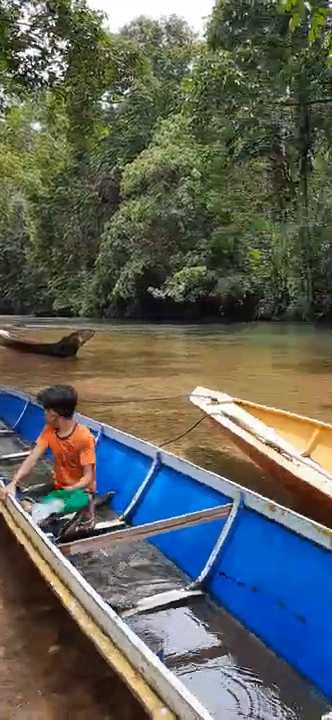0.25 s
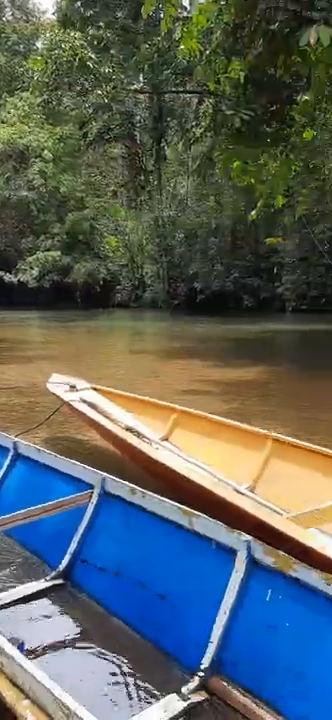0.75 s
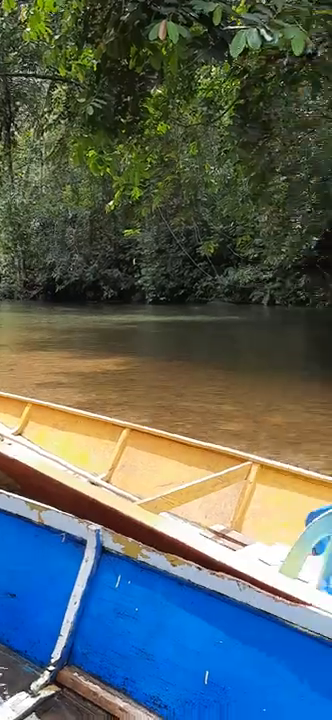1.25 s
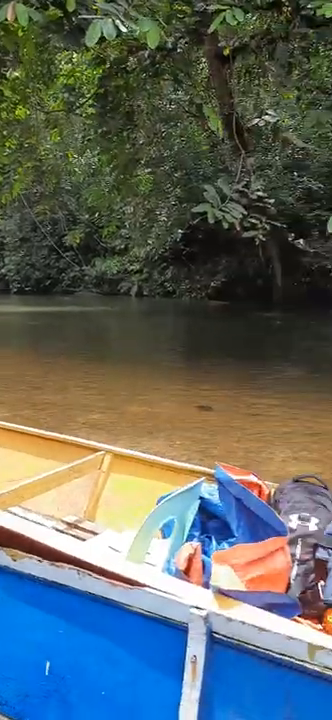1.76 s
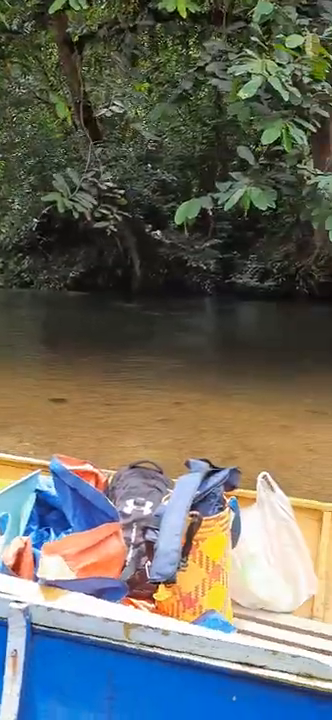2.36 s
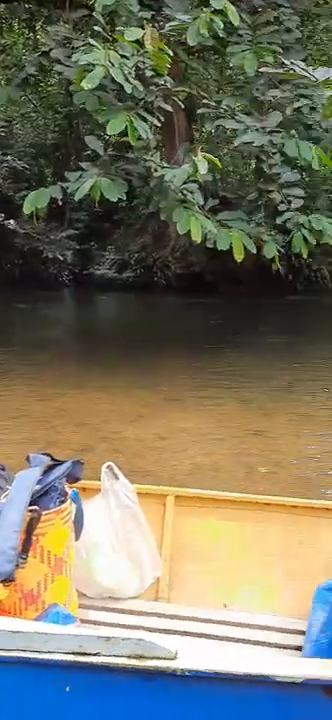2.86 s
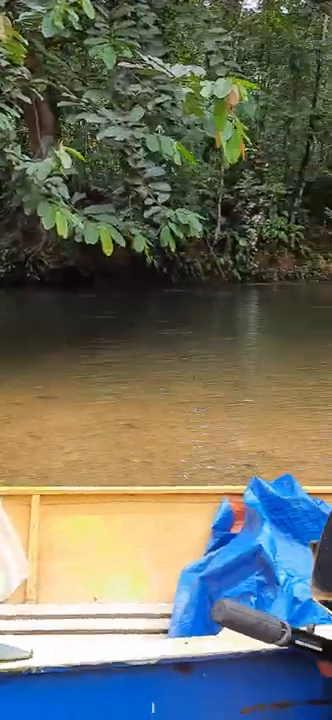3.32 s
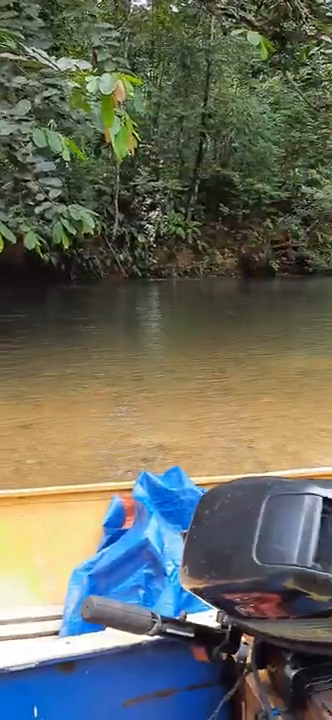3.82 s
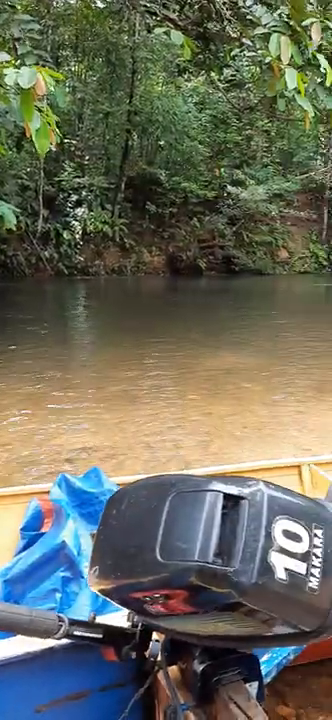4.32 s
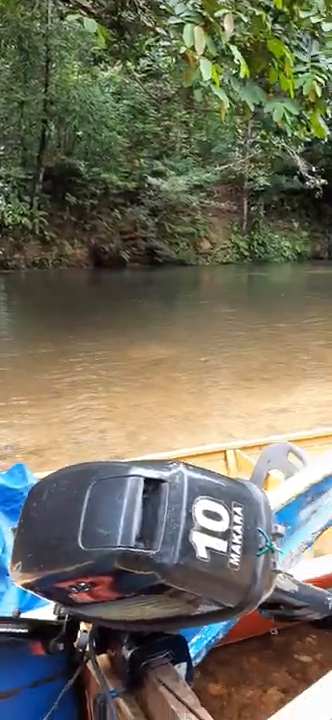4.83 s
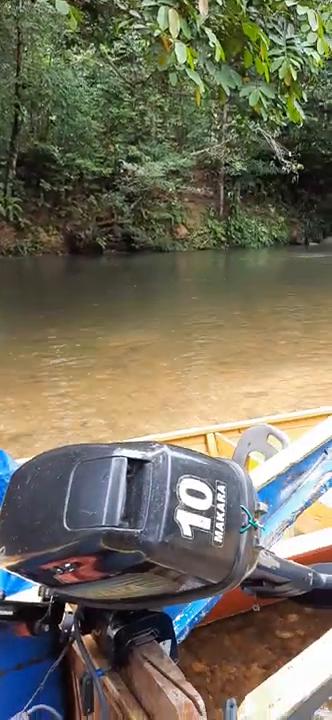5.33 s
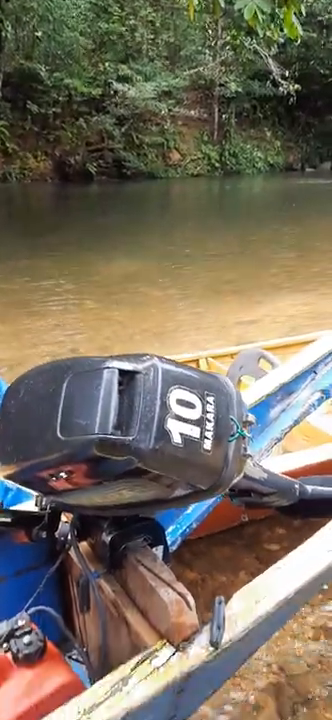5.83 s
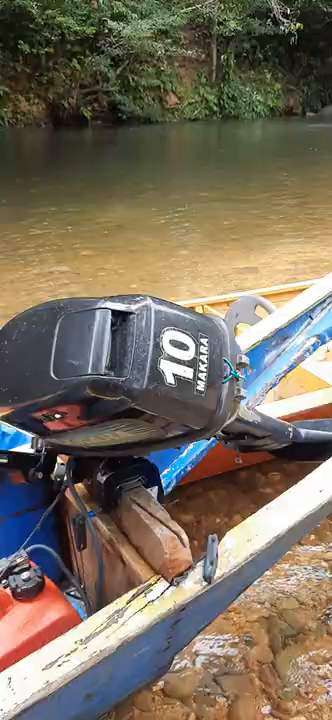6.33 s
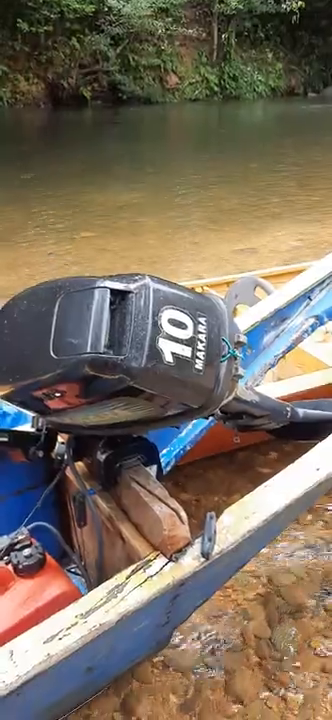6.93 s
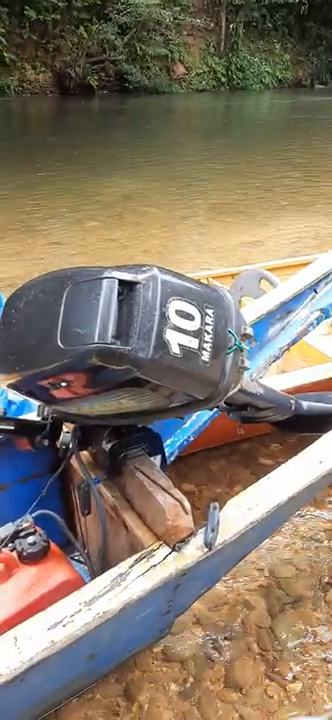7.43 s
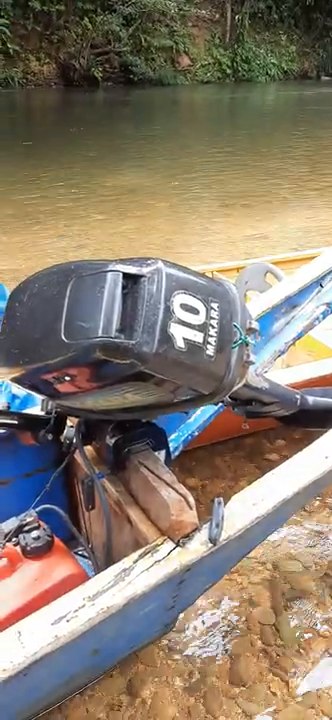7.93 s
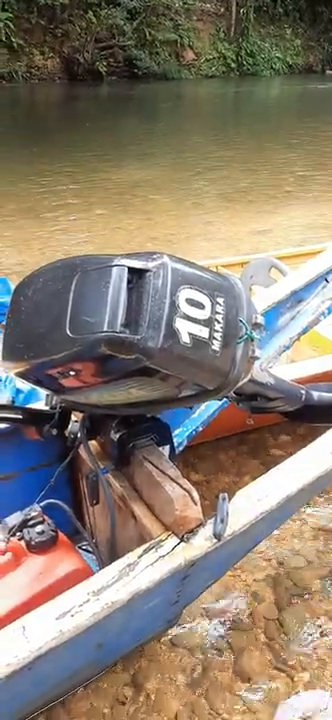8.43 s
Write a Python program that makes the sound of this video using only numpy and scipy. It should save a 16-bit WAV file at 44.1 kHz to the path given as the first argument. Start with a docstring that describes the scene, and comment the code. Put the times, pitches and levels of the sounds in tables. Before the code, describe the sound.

A close stereo phone recording on a forest river. From the very start, water is bailed from a wooden hull: throws land at about 0, 0.9, 1.8, 2.7, 3.6, 4.6, 5.6, 6.5 and 7.4 seconds. Each is a short low bubbly slosh with a bright splash, sharp slaps and crackling spray, fading quickly into drips, plops and gurgles with a brief reflection from hull and banks. The throws near 1.8 to 3.6 seconds slap hardest; the one at 7.4 has little scoop slosh. Weaker sloshes return at 8.2 and 8.5. Cicadas hold a thin high hiss, leaning left, with faint whines swelling repeatedly, over steady soft river murmur. Wind buffets the right side, thudding at 3.4 and strongly around 5.2 to 6.5, with a slight left gust near 4.8. One faint bird hoots around 7.9 to 8.1.

```python
"""On a forest river, water is bailed out of a wooden boat about once a second: swarms of damped sines over
coloured noise make the scoop's slosh in the bilge and each throw's splash and spray; single ringing air
pockets slap, plop and gurgle. Cicadas are banded hiss and thin wandering sines, the river is a steady
noise murmur, a breeze buffets mostly the right microphone port with low lumpy noise and falling thuds,
and a far bird hoots once, a soft tone with its octave."""
import sys
import numpy as np
from scipy import signal
from scipy.fft import rfft, irfft, next_fast_len
from scipy.io import wavfile
from scipy.ndimage import uniform_filter1d, map_coordinates

SR = 44100
rng = np.random.default_rng(int(sys.argv[2]) if len(sys.argv) > 2 else 0)


def boost_factor(decibels):
    """Convert a level in decibels to a linear amplitude factor."""
    exponent = np.asarray(decibels, float) / 20
    return 10 ** exponent


def materialize(psi):
    """Save the field psi as 16-bit PCM at rate SR to the path in sys.argv[1].

    A 1-D psi becomes a single channel; in a 2-D psi each row is a channel.
    """
    bounded = np.clip(np.atleast_2d(psi).T, -1, 1)
    quanta = np.round(bounded * 32767).astype(np.int16)
    wavfile.write(sys.argv[1], SR, quanta)


N = 382391


def unit(x):
    """Scales a sound to rms 1."""
    return x / np.sqrt(np.mean(x ** 2) + 1e-20)


def along(points, hz):
    """Reads (Hz, value) points along a logarithmic frequency axis."""
    f, v = np.transpose(points)
    return np.interp(np.log(hz + 1), np.log(f + 1), v)


def curves(rows):
    """Draws one value per sample for each column after the time."""
    s, *cols = np.transpose(rows)
    return [np.interp(np.arange(N) / SR, s, c) for c in cols]


def wobble(rate):
    """A smooth random curve through rate knots a second."""
    knots = rng.standard_normal(int(N * rate / SR) + 4)
    return map_coordinates(knots, [np.arange(N) * rate / SR])


def filtered(x, response):
    """Multiplies the spectrum of x by a complex response of frequency."""
    m = next_fast_len(N + 8192)
    return irfft(rfft(x, m) * response(np.fft.rfftfreq(m, 1 / SR)), m)[..., :N]


def hiss(spectrum, channels):
    """Noise coloured by a spectrum, at rms 1."""
    white = rng.standard_normal((channels, N))
    return unit(filtered(white, lambda hz: boost_factor(along(spectrum, hz))))


def swell(s, rise_s, hold_s, db, start_db, fall):
    """Gain of events that set in at start_db from full, rise, hold and fall (dB per s); overlaps add in power."""
    grid = np.arange(0, N, 64)
    t = grid / SR - np.asarray(s)[:, None]
    rise_s, hold_s, db = (np.reshape(v, (-1, 1)) for v in (rise_s, hold_s, db))
    rise_s = rise_s + 1e-3
    rise_db = np.minimum(start_db * (1 - t / rise_s), 0)
    fall_db = fall * np.maximum(t - rise_s - hold_s, 0)
    power = np.sum(boost_factor(db + rise_db - fall_db) ** 2 * (t >= 0), axis=0)
    return np.interp(np.arange(N), grid, np.sqrt(power))


def bubbles(s, hz, db, cycles, rise, size, soft=0.022):
    """Damped sines, eased in over soft cycles and 30 dB down after cycles; a positive rise bends pitch upward."""
    t = np.arange(size) / SR
    turns = hz[:, None] * t
    wave = np.sin(2 * np.pi * turns * (1 + rise * turns / cycles))
    wave = wave * np.exp(-np.log(1000) * turns / cycles / 2)
    wave = wave * (1 - np.exp(-turns / soft)) * np.hanning(2 * size)[size:]
    at = np.round(s * SR).astype(int)[:, None] + np.arange(size)
    return np.bincount(at.ravel(), (boost_factor(db)[:, None] * wave).ravel(), N + SR)[:N]


def froth(spectrum, mid_hz, spread, cycles, uneven_db, share, count, size):
    """A swarm of bubbles of scattered size holds a share of the power; rushing noise holds the rest."""
    hz = np.clip(mid_hz * np.exp(spread * rng.standard_normal(count)), 100, SR / 2.5)
    db = uneven_db * rng.standard_normal(count)
    swarm = bubbles(rng.random(count) * N / SR, hz, db, cycles, rise=0.2, size=size, soft=1.03)
    swarm = unit(filtered(swarm, lambda f: boost_factor(np.minimum(along(spectrum, f) + 12, 0))))
    return np.sqrt(share) * swarm + np.sqrt(1 - share) * hiss(spectrum, channels=1)[0]


def spurts(rate, fade_s, depth):
    """Water arrives in handfuls, rate a second: each starts at once and thins out."""
    starts = (rng.random(N) < rate / SR) * rng.random(N)
    return 1 + depth * signal.lfilter([1], [1, -np.exp(-1 / (fade_s * SR))], starts)


# the scoop drags through the bilge, levels before the mix trims: start_s, swell_s, hold_s, slosh_db, splash_db
SCOOP_STROKES = [(0.0, 0.049, 0.066, -30.5, -29), (0.879, 0.11, 0.011, -26.5, -29),
                 (1.788, 0.083, 0.043, -30.5, -29), (2.726, 0.096, 0.057, -31, -32.5),
                 (3.685, 0.12, 0.012, -29, -34), (4.608, 0.14, 0.044, -31.5, -34.5),
                 (5.541, 0.065, 0.079, -29.5, -33.5), (6.472, 0.067, 0.045, -28.5, -29),
                 (7.362, 0.026, 0.38, -49, -43), (8.207, 0.13, 0.1, -32.5, -33),
                 (8.506, 0.0062, 0.021, -35, -37.5)]
# thrown water lands on the river, levels before the mix trims:
# full_s, lead_s (first drops ahead of full), hold_s, spray_db, slap_db
WATER_THROWS = [(0.015, 0.015, 0.12, -25.5, -33), (0.897, 0.059, 0.014, -23, -29),
                (1.806, 0.0047, 0.069, -25, -24), (2.688, 0.037, 0.021, -25.5, -21),
                (3.621, 0.04, 0.023, -26.5, -24), (4.593, 0.046, 0.032, -28.5, -27.5),
                (5.566, 0.076, 0.023, -27.5, -31.5), (6.478, 0.086, 0.13, -31, -31.5),
                (7.382, 0.08, 0.022, -26, -26)]


def efforts():
    """Gains of slosh, splash and spray: each stroke swells, stops and leaves water running off."""
    lead_db, entry_db, churn_db = -22, -4, -11.5  # onset under full: first drops, slosh, splash
    spray_fall, slap_fall, slosh_fall, splash_fall = 400, 300, 170, 130  # dB per s
    # run-off: (dB against the peak, fall in dB per s)
    spray_drip, slosh_drip, splash_drip = (-11, 36), (-15, 55), (-9, 40)
    s, lead_s, length_s, spray_db, slap_db = np.transpose(WATER_THROWS)
    at, swell_s, hold_s, slosh_db, churned_db = np.transpose(SCOOP_STROKES)

    def throw(hold, db, fall):
        return swell(s - lead_s, lead_s, hold, db, lead_db, fall)

    def scoop(db, start_db, fall, drip):
        stroke = swell(at, swell_s, hold_s, db, start_db, fall)
        run_off = swell(at, swell_s, hold_s, db + drip[0], start_db, drip[1])
        return np.hypot(stroke, run_off)

    drip_db, drip_fall = spray_drip
    spray = np.hypot(throw(length_s, spray_db, spray_fall), throw(length_s, spray_db + drip_db, drip_fall))
    slosh = scoop(slosh_db, entry_db, slosh_fall, slosh_drip)
    churn = scoop(churned_db, churn_db, splash_fall, splash_drip)
    return slosh, np.hypot(churn, throw(0, slap_db, slap_fall)), spray


# water slaps on water or wood, levels before the ring and crack trims: start_s, level_db, pitch_hz
WATER_SLAPS = [(0.107, -18, 2460), (0.142, 1, 6400), (0.225, -15.5, 1510), (0.57, -15, 3560),
               (0.858, -20, 3570), (0.908, -6, 1700), (1.809, 2, 2200), (1.861, -10, 1340),
               (1.932, -4, 5000), (2.652, -2.5, 5550), (2.69, -3.5, 1210), (2.699, -8, 1900),
               (3.607, -5, 1960), (3.623, -8, 960), (3.649, -5.5, 2420), (4.457, -17.5, 1830),
               (4.577, -7, 2260), (4.591, -11, 1520), (5.365, -17, 1600), (5.544, -11, 725),
               (5.548, -2.5, 6200), (5.562, 0.5, 4200), (6.418, -12, 5560), (6.482, -9.5, 3050),
               (6.672, -11.5, 1800), (7.358, -6, 1740), (7.43, -11, 4960)]
# single pockets of air plop and gurgle, levels before the trim: start_s, level_db, pitch_hz
AIR_PLOPS = [(0.071, -16.5, 586), (.265, -28.5, 930), (.311, -32, 1880), (0.363, -28, 1060),
             (0.416, -34, 686), (1.78, -24.5, 750), (1.979, -28, 840), (2.036, -25, 2040),
             (2.743, -19, 490), (3.008, -23.5, 586), (3.696, -28, 745), (3.808, -17, 585),
             (4.636, -23, 704), (4.746, -15.5, 644), (5.654, -17.5, 576), (6.478, -25, 736),
             (6.61, -19, 657), (8.347, -22, 660), (7.364, -17.5, 1330), (7.45, -30, 1510),
             (7.534, -20.5, 312), (8.21, -23, 770), (8.464, -25, 1820), (8.522, -28, 563)]


def plops():
    """Each one is a ringing pocket of air; a slap also cracks, as small bubbles are torn off at the blow."""
    s, db, hz = np.transpose(WATER_SLAPS)
    slap_ring = bubbles(s, hz, db - 5, cycles=12, rise=.1, size=1500, soft=.7)
    at, plop_db, plop_hz = np.transpose(AIR_PLOPS)
    life = 0.022 * plop_hz[:, None]  # cycles in 22 ms, the time to fall 30 dB
    plop_ring = bubbles(at, plop_hz, plop_db + 4, cycles=life, rise=0.075, size=1500, soft=0.52)
    # 24 small bubbles a slap, the later the softer
    late, smallness = rng.random((2, len(s), 24))
    largest_hz = np.minimum(hz[:, None], 4000)
    crack_hz = largest_hz * (14000 / largest_hz) ** smallness
    crack_db = db[:, None] - 8 - 12 * late
    crack_s = s[:, None] + .009 * late ** 2
    crack = bubbles(crack_s.ravel(), crack_hz.ravel(), crack_db.ravel(), cycles=3.5, rise=.1, size=300)
    return slap_ring + plop_ring + crack


# answer of hull and banks: pitch_hz, t60_s
BANK_DECAY = [(300, 0.24), (10000, 0.18)]


def ports(x, echo_db):
    """The left port hears the boat late, by more as the phone turns away; hull and banks answer unlike by side."""
    hz, t, z = signal.stft(rng.standard_normal((2, 2, SR // 4)), SR, nperseg=256)
    decay = boost_factor(-60 * t / along(BANK_DECAY, hz)[:, None])
    tail = signal.istft(z * decay, SR, nperseg=256)[1]
    tail = tail / np.linalg.norm(tail[0, 0])
    # the answer turns steadily between two random tails, once in 0.7 s, so no fixed pitch stands out
    turn = 2 * np.pi * np.arange(N) / SR / .7
    places = x * np.array([np.cos(turn), np.sin(turn)])
    echo = signal.fftconvolve(places[:, None], tail, axes=2).sum(axis=0)[:, :N]
    lag_s = np.linspace(.00009, .00018, N) + .00006 * wobble(40)  # drops land all over the water
    late = map_coordinates(x, [np.arange(N) - SR * lag_s])
    direct = np.array([late, x])
    return (direct + boost_factor(echo_db) * echo) * boost_factor([[1.2], [-1.2]])


# water spectra, relative: pitch_hz, level_db (per Hz)
SLOSH_SPECTRUM = [(100, -49), (170, -7), (470, -9.5), (630, -13.5), (800, -9.5), (2200, -35.5)]
SPLASH_SPECTRUM = [(500, -33), (1100, -9.5), (2300, -4.5), (4200, -25)]
SPRAY_SPECTRUM = [(1500, -5), (3200, 8), (8000, -1.5), (16000, -3)]


def bailing():
    """Large bubbles slosh in the hull, middle ones burst in the splash, fine drops crackle in the spray."""
    slosh_gain, splash_gain, spray_gain = efforts()
    slosh = froth(SLOSH_SPECTRUM, 617.0, 0.1834, cycles=19, uneven_db=4, share=0.73, count=2200, size=1400)
    splash = froth(SPLASH_SPECTRUM, 1603, 0.364, cycles=15.9, uneven_db=1.5, share=0.7, count=3200, size=600)
    spray = froth(SPRAY_SPECTRUM, 6500, .55, cycles=3, uneven_db=4.5, share=.55, count=24000, size=64)
    plinks = froth(SPLASH_SPECTRUM, 1319, 0.47, cycles=29.5, uneven_db=8.5, share=1.0, count=900, size=600)
    handfuls = spurts(55, fade_s=.004, depth=2.6)
    # the current plinks along the hull all the while, and more with each splash
    thrown = (boost_factor(-58) + boost_factor(-7.5) * splash_gain) * plinks
    thrown = thrown + splash_gain * unit(splash * handfuls ** 0.68)
    thrown = thrown + boost_factor(2.0) * spray_gain * unit(spray * handfuls)
    pockets = filtered(plops(), lambda hz: (1j * hz / (250 + 1j * hz)) ** 2)  # bass rolled off below 250 Hz
    in_hull = ports(slosh_gain * slosh, echo_db=-12.0)
    return in_hull + ports(pockets, echo_db=-5.0) + ports(thrown, echo_db=-4.0)


def tone(hz, unsteady):
    """A sine whose phase wanders separately on each side."""
    wander = unsteady * np.array([wobble(16), wobble(7.5)])
    return np.sqrt(2) * np.sin(2 * np.pi * np.cumsum(hz) / SR + wander)


# cicada hiss before its trim: time_s, level_db, left_over_right_db
CICADA_CHORUS = [(0, -38, 2.5), (8.67, -38.5, 6)]
# cicada hiss spectrum, relative: pitch_hz, level_db (per Hz)
CICADA_SPECTRUM = [(4800, -19), (5500, -13), (5850, -7), (6200, 2.5), (6800, -9.5), (7300, 2.5),
                   (7950, 3.5), (8400, -4), (9000, -41)]
# pitch of the nearest cicada: time_s, pitch_hz
NEAR_WHINE = [(0, 10430), (3.4, 10430), (5.8, 10440), (8.67, 10460)]
# the nearest cicada swells again and again, before its flutter: peak_s, level_db
NEAR_SWELLS = [(1.25, -47), (1.78, -46), (2.6, -49.5), (3.17, -45), (3.6, -49), (4.52, -50), (5.2, -46),
               (5.44, -49), (5.67, -43), (6.049, -60), (6.858, -48), (7.62, -53)]
# far singers, about which level and pitch wander: pitch_hz, level_db
FAR_SINGERS = [(2615, -66), (10130, -66), (11340, -62), (11580, -62)]


def cicadas():
    """A far chorus blurs into two bands of hiss; single singers hold thin whines that swell and fade."""
    chorus_db, pan_db = curves(CICADA_CHORUS)
    chorus_db = chorus_db - 0.5 + 0.74 * wobble(21) + [pan_db / 2, -pan_db / 2]
    chorus = boost_factor(chorus_db) * hiss(CICADA_SPECTRUM, channels=2)
    swell_s, between_db = 0.061, -51.5  # bell width, and level kept between swells
    t = np.arange(N) / SR
    near_gain = boost_factor(between_db)
    for at, peak_db in NEAR_SWELLS:
        near_gain = near_gain + boost_factor(peak_db) * np.exp(-((t - at) / swell_s) ** 2 / 2)
    near = near_gain * boost_factor(1.6 * wobble(12)) * tone(curves(NEAR_WHINE)[0], unsteady=1.0)
    far = 0
    for pitch_hz, level_db in FAR_SINGERS:
        far = far + boost_factor(level_db + 4 * wobble(3)) * tone(pitch_hz + 12 * wobble(0.69), unsteady=0.5)
    return chorus + near + far


# murmur spectrum, relative: pitch_hz, level_db (per Hz)
RIVER_SPECTRUM = [(110, -32.5), (300, 0.5), (700, -1.5), (2500, -8), (4000, -23), (9300, -16.5),
                  (11000, -5), (12600, -5), (13700, -17), (14800, -6.5), (16000, -5.5)]
# left-right likeness of the murmur: pitch_hz, likeness (1 = same on both sides)
RIVER_LIKENESS = [(300, 1), (700, 0.73), (1500, 0.042)]


def river():
    """The steady murmur of water and leaves, alike on both sides only in the bass."""
    def mid_side(hz):
        turn = np.arccos(np.clip(along(RIVER_LIKENESS, hz), -1, 1)) / 2
        return np.array([np.cos(turn), np.sin(turn)])

    mid, side = filtered(hiss(RIVER_SPECTRUM, channels=2), mid_side)
    swell_db = 1.8 * wobble(4.2)
    return boost_factor(-43.5 + swell_db) * np.array([mid + side, mid - side]) * boost_factor([[1.1], [-1.1]])


# gusts on each port: full_s, hold_s, level_db
LEFT_PORT_GUSTS = [(4.79, 0.14, -37), (7.265, 0.3, -51)]
RIGHT_PORT_GUSTS = [(0.82, 0.057, -44), (1.905, 0.034, -36), (2.722, 0.037, -39.5), (3.423, 0.069, -23.5),
                    (3.778, 0.66, -37.5), (4.597, 0.48, -32), (5.207, 0.45, -26), (5.948, 0.56, -28),
                    (6.875, 0.49, -39.5), (7.557, 0.83, -36.5), (8.58, 0.035, -29)]
# buffeting spectrum, relative: pitch_hz, level_db (per Hz)
BUFFET_SPECTRUM = [(20, -60), (45, -5), (75, -1), (120, -5), (200, -22.5), (400, -49)]
# single eddies strike the right port, levels before boost and smoothing: start_s, level_db
EDDY_THUDS = [(3.393, -32), (3.481, -29.5), (3.527, -33), (5.228, -34.5), (5.562, -29.5)]


def wind():
    """Eddies thump each port on its own, the right one far harder; the sharpest are short falling thuds."""
    rise_s, start_db, fall, calm_db = 0.1, -29, 74, -66.5  # fall in dB per s; calm_db never stops
    lumps = boost_factor(8 * np.tanh(np.array([wobble(21), wobble(22)])))
    gusts = []
    for rows in (LEFT_PORT_GUSTS, RIGHT_PORT_GUSTS):
        s, hold_s, db = np.transpose(rows)
        gusts.append(swell(s - rise_s, rise_s, hold_s, db, start_db, fall) + boost_factor(calm_db))
    buffets = np.array(gusts) * unit(lumps * hiss(BUFFET_SPECTRUM, channels=2))
    s, db = np.transpose(EDDY_THUDS)
    thuds = bubbles(s, np.full(len(s), 198.0), db + 18.0, cycles=4.1, rise=-0.5, size=1400)
    thuds = uniform_filter1d(thuds, size=60)  # dulls the onset
    return buffets + thuds * np.array([[0], [1]])


# the hoot's glide and level before its flutter: time_s, pitch_hz, level_db
BIRD_HOOT = [(7.8, 815, -62), (7.86, 826, -55), (8.1, 806, -56), (8.17, 808, -75)]


def bird():
    """One soft far note with its octave, both wandering in phase angle."""
    hz, db = curves(BIRD_HOOT)
    sounding = db > max(db[0], db[-1])  # silent before and after the note
    note = tone(hz, unsteady=0.56) + tone(2 * hz, unsteady=0.68)
    return boost_factor(db + 4.2 * wobble(25)) * note * sounding


def scene():
    """Boat, forest, river, breeze and bird."""
    return bailing() + cicadas() + river() + wind() + bird()


def roll_off(x):
    """The treble ends steeply here."""
    return signal.sosfilt(signal.butter(12, 16820, fs=SR, output="sos"), x)


def record(dry):
    """The phone keeps nothing above its band limit."""
    top_hz = 15950
    mix = filtered(dry, lambda hz: hz < top_hz)
    return roll_off(mix)


dry = scene()
out = record(dry)
materialize(out)
```